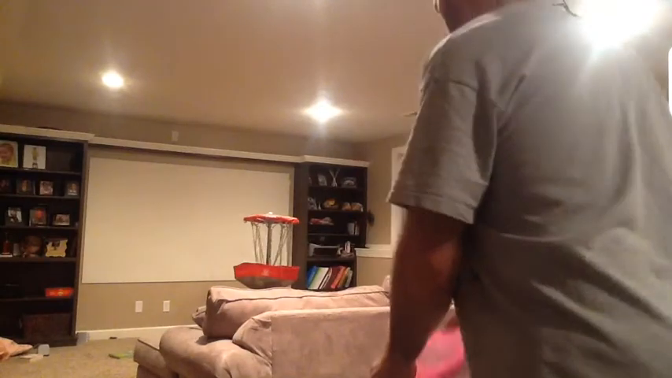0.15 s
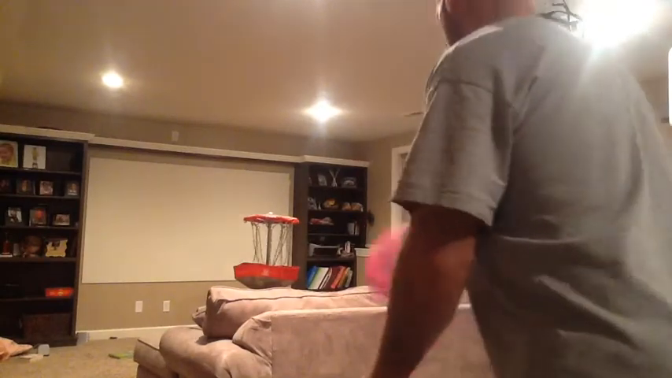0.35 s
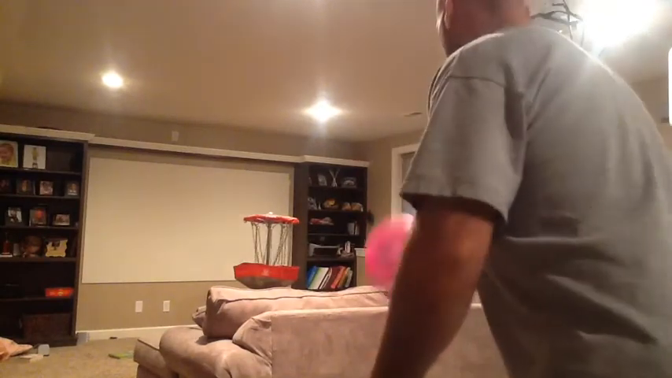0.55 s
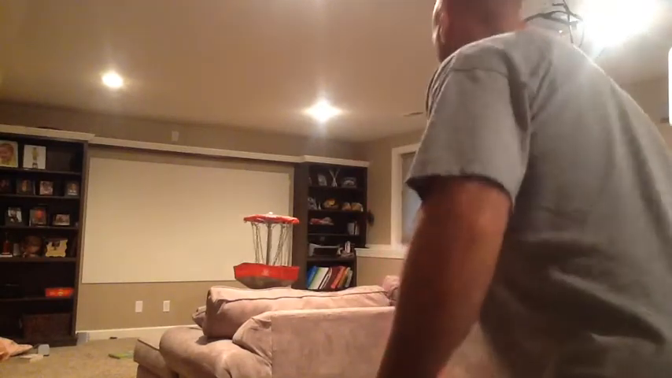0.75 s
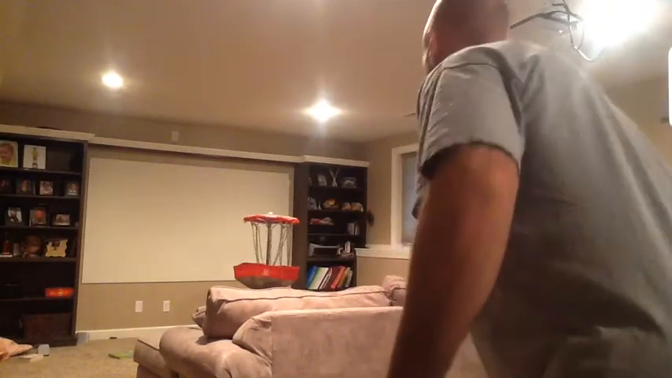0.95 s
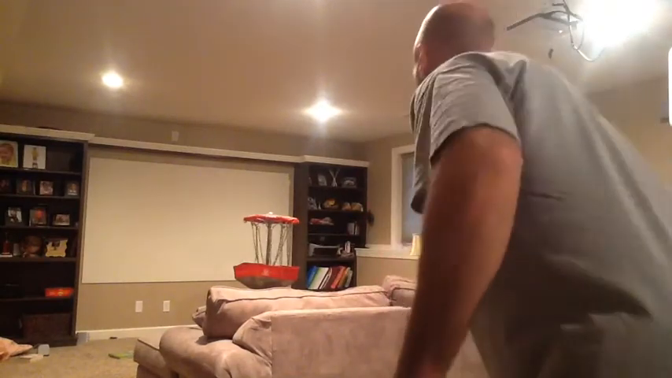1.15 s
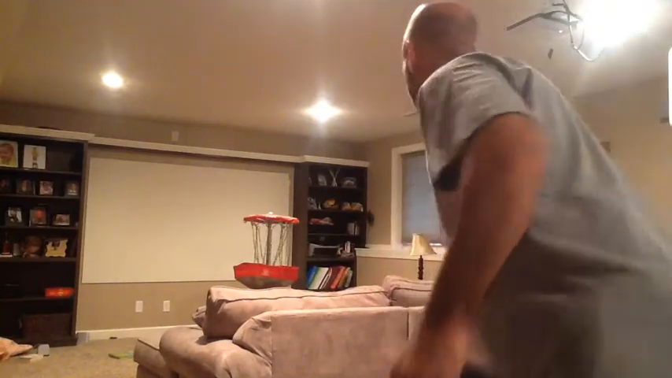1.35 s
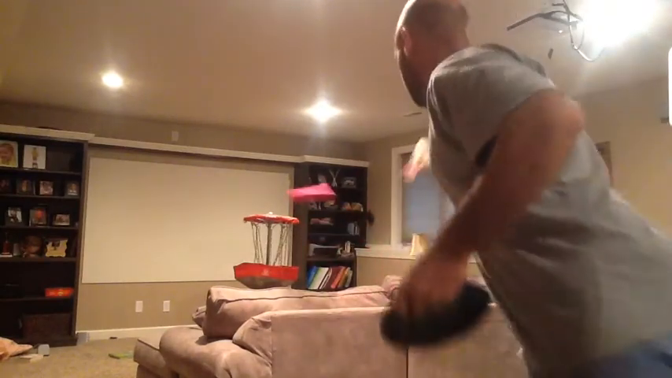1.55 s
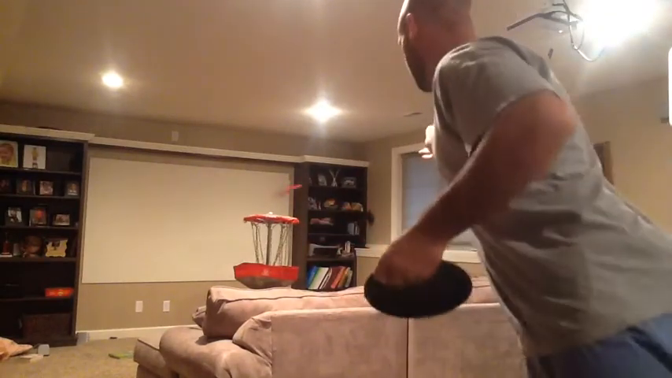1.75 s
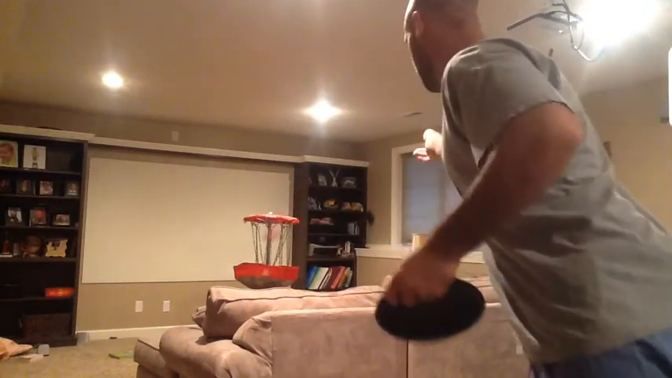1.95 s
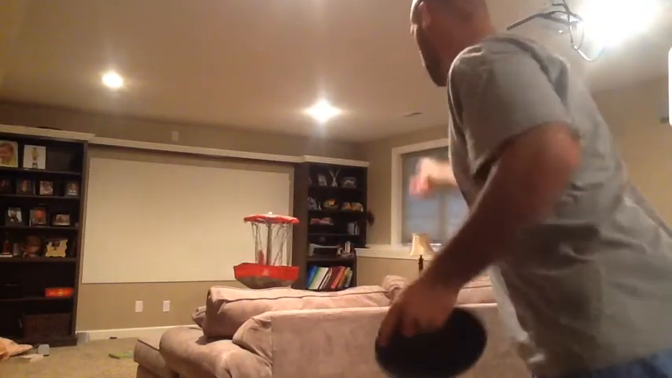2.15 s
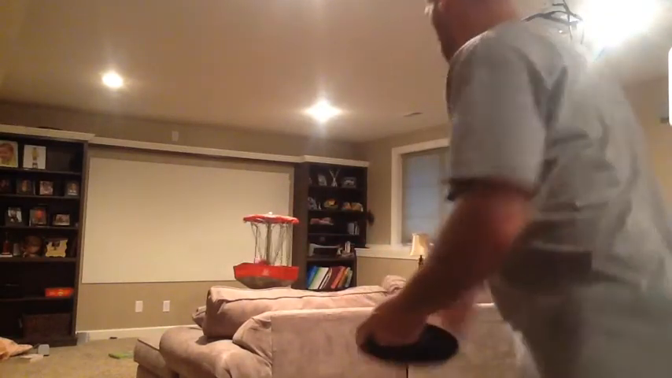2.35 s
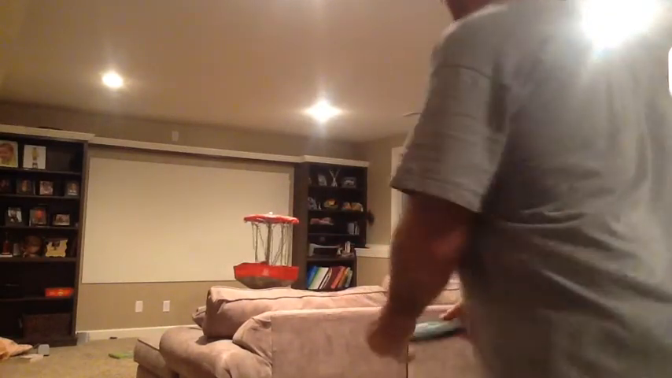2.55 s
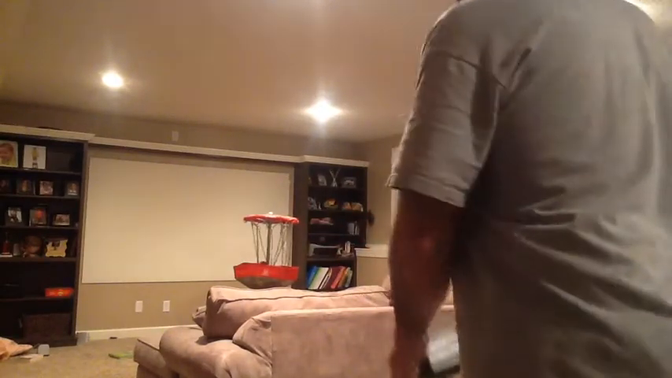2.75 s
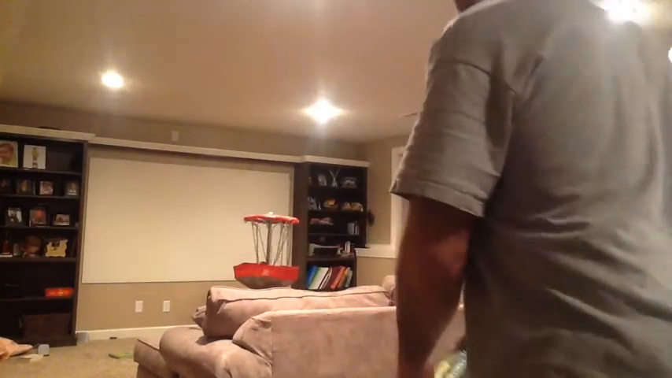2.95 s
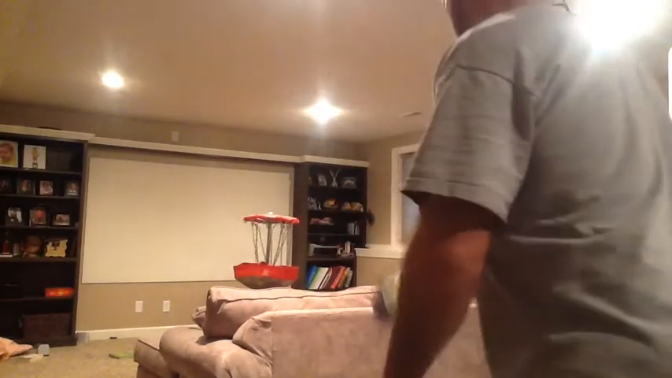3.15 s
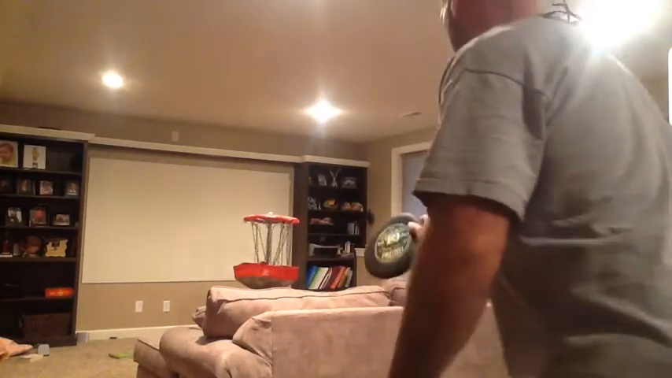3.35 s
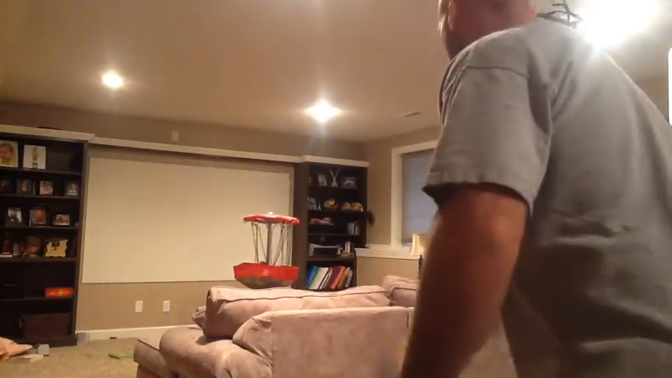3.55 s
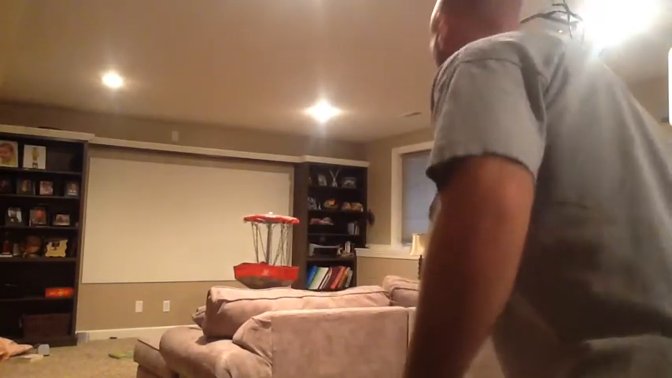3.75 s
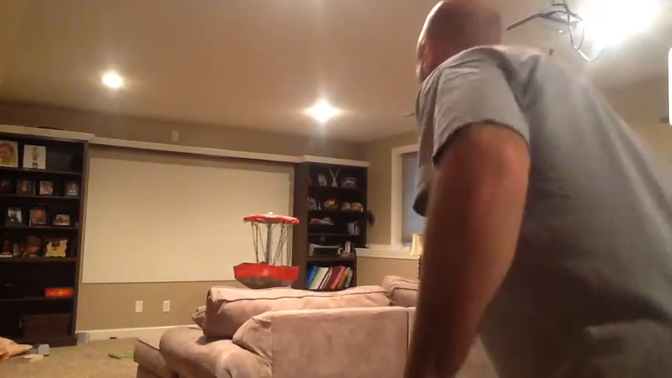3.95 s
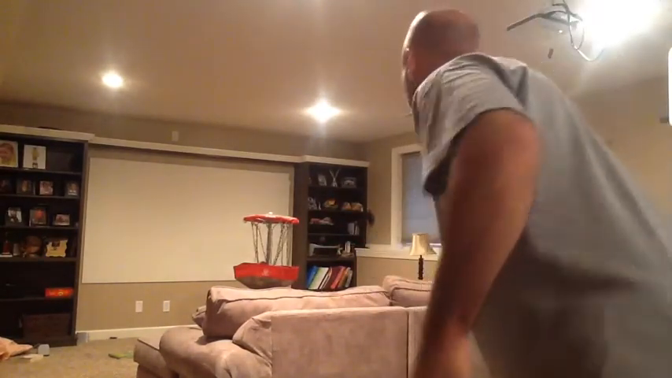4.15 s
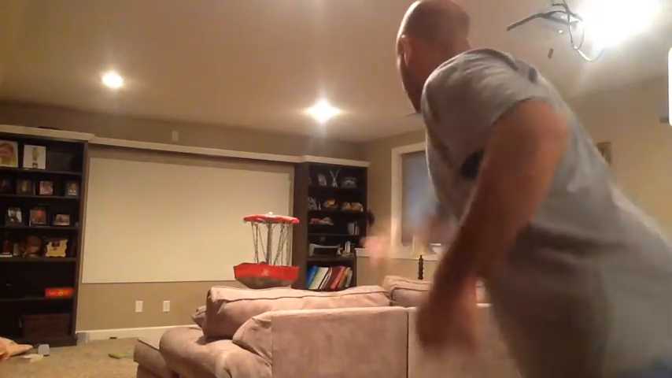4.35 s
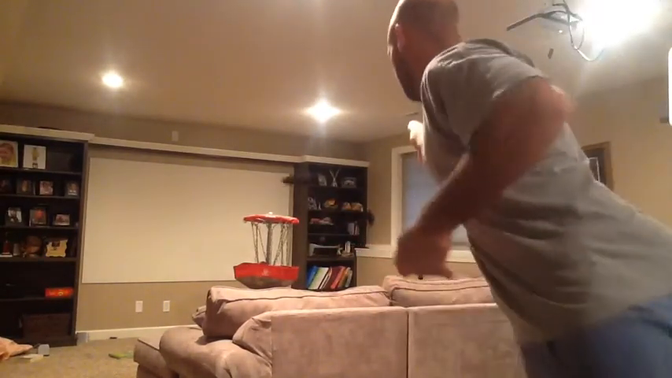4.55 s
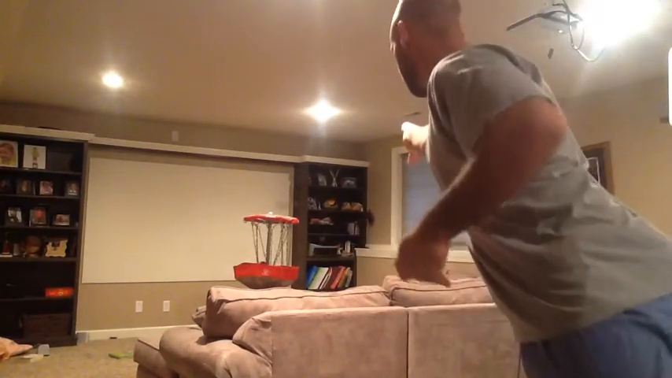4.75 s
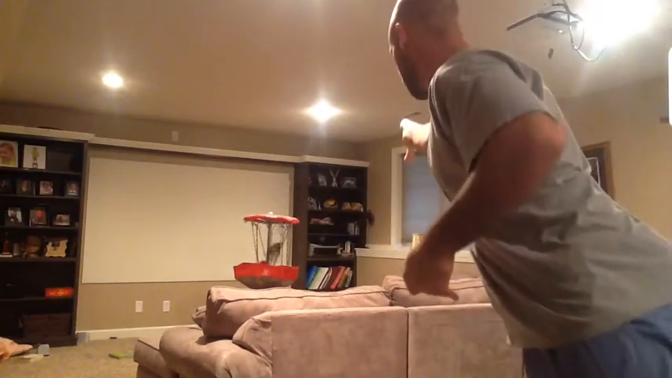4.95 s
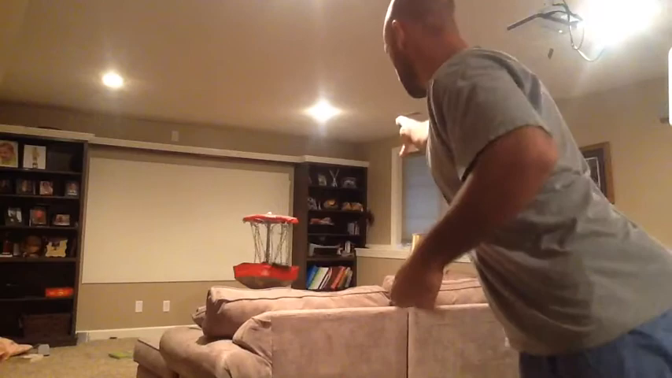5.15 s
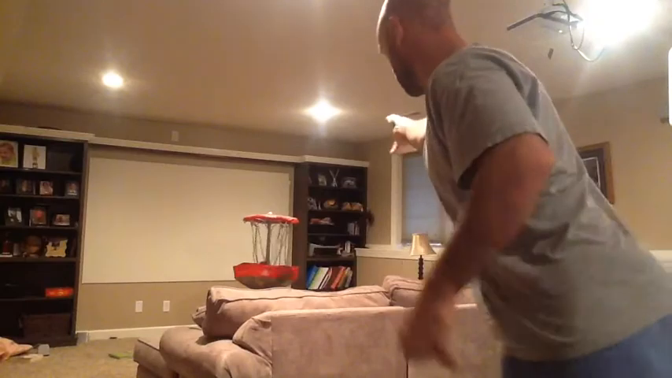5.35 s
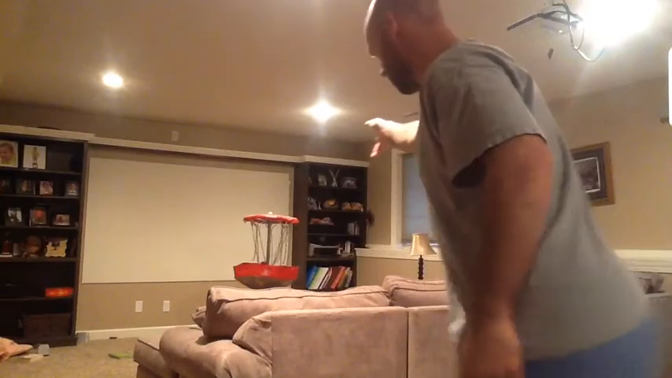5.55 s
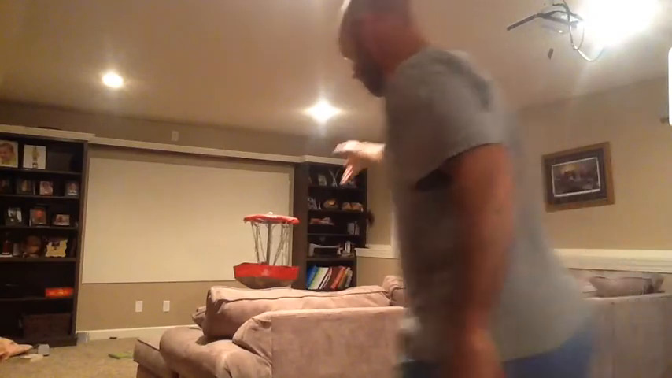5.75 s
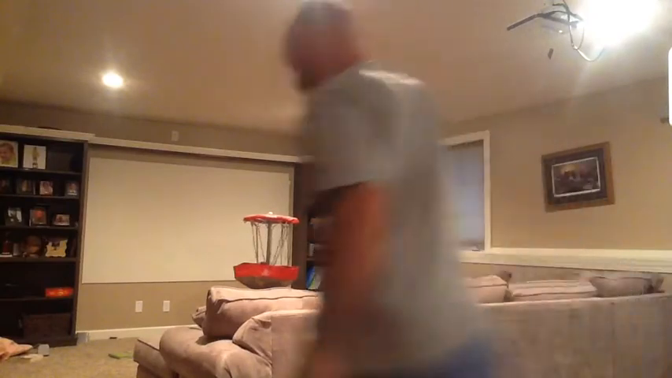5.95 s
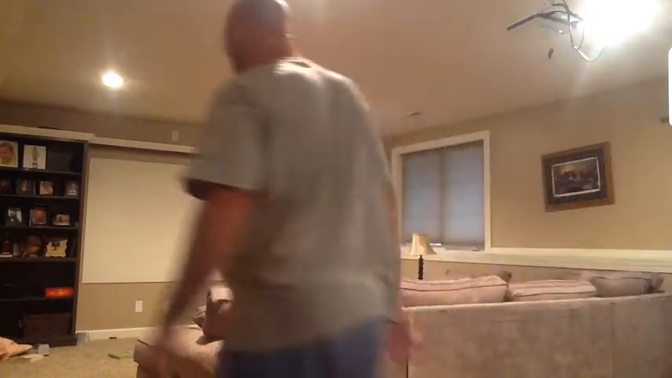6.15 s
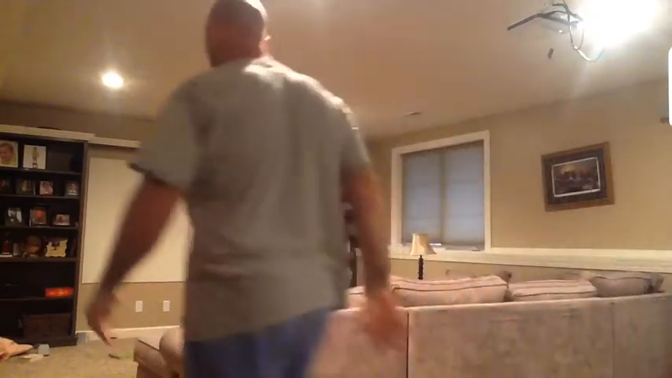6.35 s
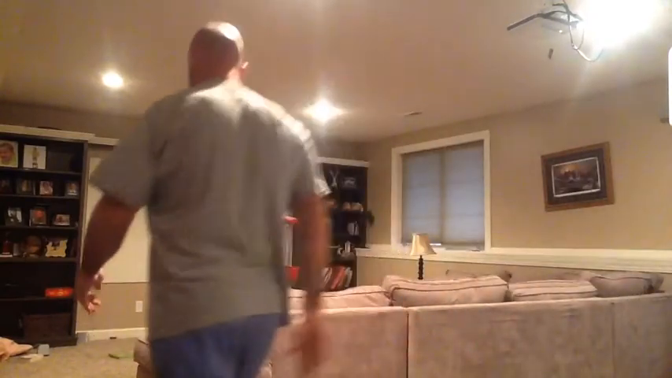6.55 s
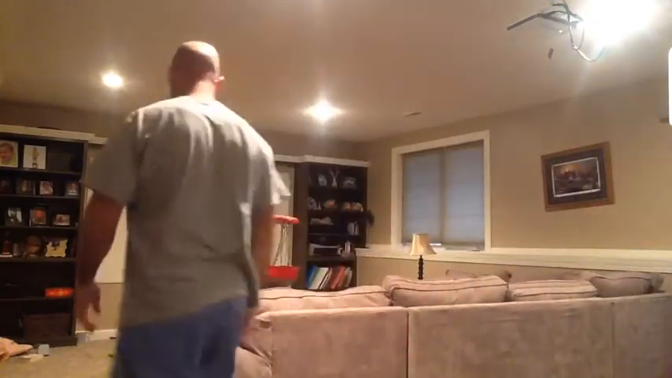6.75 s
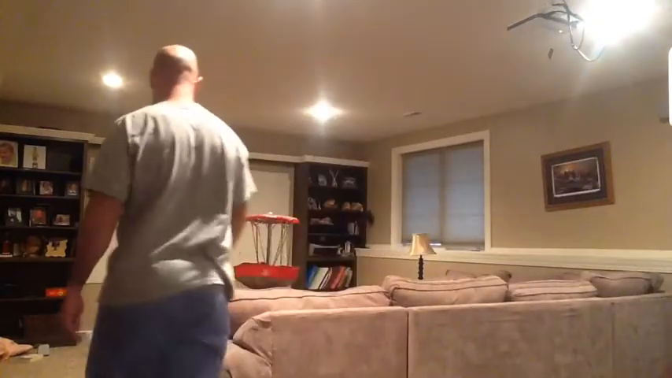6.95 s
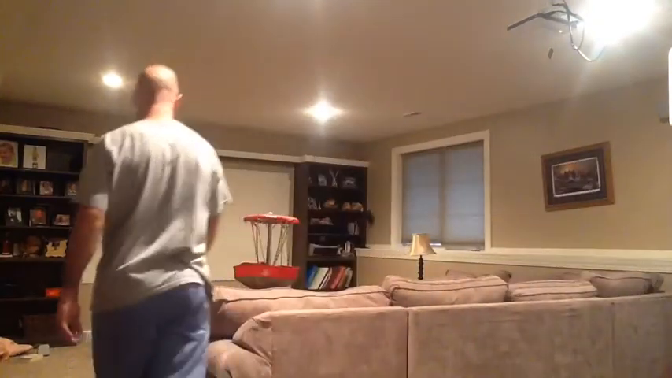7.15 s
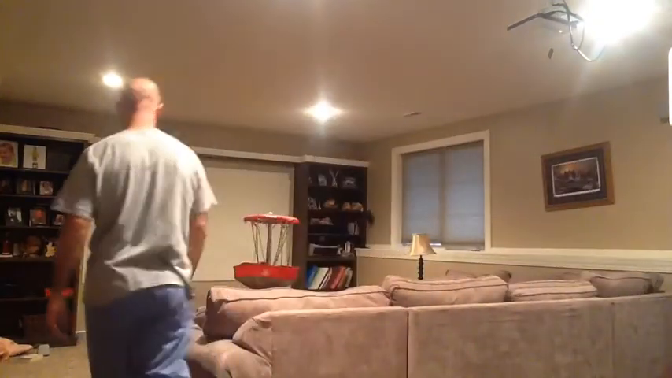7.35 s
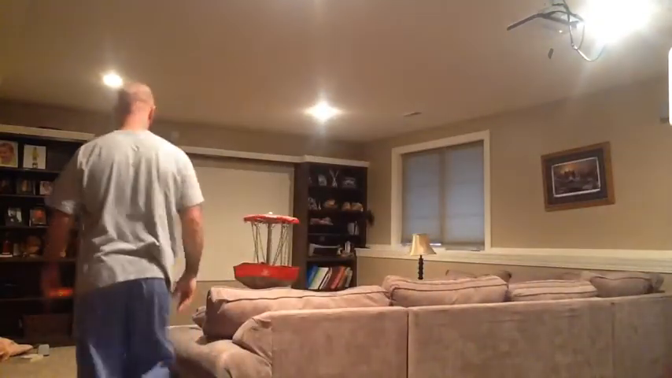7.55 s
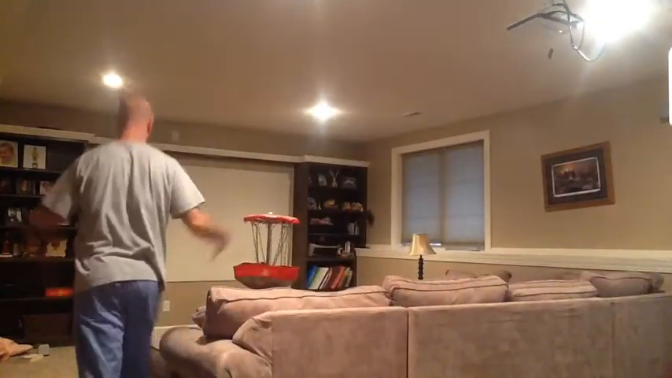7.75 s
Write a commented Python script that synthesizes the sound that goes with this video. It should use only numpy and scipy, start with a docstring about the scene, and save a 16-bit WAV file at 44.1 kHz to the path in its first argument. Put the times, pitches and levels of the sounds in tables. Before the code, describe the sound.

Two plastic discs are thrown, one after the other, into a chain basket across a basement room. Each lands with a sudden, bright metallic jangle, rings the steel pole and settles softly into the tray, while the swaying chains tinkle on. Close to the microphone, clothes swish faintly with each throw, and a few soft steps on carpet follow the second. Faint taps, dull thuds and a low hiss lie underneath.

```python
"""A carpeted basement room, one microphone near the thrower, a chain basket across the room.
Two plastic discs are putted. Each splashes into the chains and drives them against the steel pole,
whose tube rings; then it rattles down into the tray. The swaying chains tinkle link against link.
Close by, clothes and steps rustle; dull floor thuds and faint hollow taps sound over a low hiss."""
import sys
import numpy as np
from scipy import signal
from scipy.fft import rfft, irfft
from scipy.io import wavfile
from scipy.ndimage import uniform_filter1d

SR = 44100
rng = np.random.default_rng(int(sys.argv[2]) if len(sys.argv) > 2 else 0)


def wav_out(sig):
    """Save sig, one row per channel (or a flat mono array), as 16-bit PCM at SR to the path in sys.argv[1]."""
    wavfile.write(sys.argv[1], SR, np.round(np.clip(np.atleast_2d(sig).T, -1, 1) * 32767).astype(np.int16))


N = 347949
SPAN = 32768  # samples for one contact and its echoes
AGE = np.arange(SPAN) / SR  # s since the contact

# a disc meets the chains: t/s, disc level/dB, disc f/Hz, splash level/dB, link level/dB, rattle decay/s
CATCHES = [(2.053, -41, 865, -18, -26, .035), (4.951, -25.5, 1087, -16.5, -21.5, .022)]
# chains slap the pole: t/s, clack level/dB, three-lobed level/dB, rattle decay/s, first chain's lead/s
POLE_HITS = [(2.085, -11, -6.5, 0.0092, 0.00094), (2.167, -18.5, -19, 0.012, .01),
             (4.982, -7.5, -16, 0.0038, 0.0012), (5.124, -17.5, -12.5, 0.012, .018),
             (5.292, -22, -16.5, 0.0076, .016), (5.576, -19, -22.5, 0.018, 0)]


def from_db(db):
    """Decibels as an amplitude."""
    return 10 ** (np.asarray(db) / 20)


def unit(x):
    """Scaled to an energy of one."""
    return x / np.sqrt(np.sum(x ** 2) + 1e-20)


def at_hz(points, hz):
    """A table read on a log-frequency axis."""
    known_hz, values = np.transpose(points)
    return np.interp(np.log(np.maximum(hz, 1)), np.log(known_hz), values)


def low_cut(x, hz):
    """Bass roll-off of 12 dB an octave."""
    return signal.sosfilt(signal.butter(2, hz, "high", fs=SR, output="sos"), x)


def noise(spectrum):
    """Steady coloured noise of rms one."""
    gain = from_db(at_hz(spectrum, np.arange(N // 2 + 1) * SR / N))
    return unit(irfft(rfft(rng.standard_normal(N)) * gain, N)) * np.sqrt(N)


def snap(spectrum):
    """The shortest causal pulse that has this spectrum."""
    gain = from_db(at_hz(spectrum, np.arange(SPAN // 2 + 1) * SR / SPAN))
    cepstrum = irfft(np.log(gain))
    cepstrum[1:SPAN // 2] *= 2  # fold to minimum phase
    cepstrum[SPAN // 2 + 1:] = 0
    return irfft(np.exp(rfft(cepstrum)))


def mode(hz, t60):
    """A struck resonance; small bodies radiate little below their pitch."""
    ring = np.cos(2 * np.pi * hz * AGE) * from_db(-60 * AGE / t60)
    return ring * (1 - np.exp(-AGE * hz / 2))


def rattle(decay_s, per_s=700, uneven_db=4.5, first=1.2):
    """A first contact, then a dying shower of uneven ones."""
    count = int(.3 * SR)
    sizes = from_db(uneven_db * np.clip(rng.standard_normal(count), -2, 1))
    sizes *= rng.choice([-1, 1], count)
    clicks = sizes * (rng.random(count) < per_s / SR) * np.exp(-AGE[:count] / max(decay_s, .001))
    clicks[0] = first
    return clicks


def basement(early_db=1.0, early_s=.016):
    """The room, per band: its share of the spectrum and the energy decay of early echoes and tail."""
    # reverberation time: f/Hz, t60/s
    reverb_times = [(150, 0.48), (2000, 0.42), (4000, .47), (8000, .43), (14000, 0.38)]
    hz, bands = np.arange(SPAN // 2 + 1) * SR / SPAN, []
    early = from_db(early_db) * unit(np.exp(-AGE / early_s))
    for band, (_, t60) in enumerate(reverb_times):
        share = at_hz([(row[0], k == band) for k, row in enumerate(reverb_times)], hz)
        tail = unit(from_db(-60 * AGE / t60))
        bands.append((share, rfft(early ** 2 + tail ** 2)))
    return bands


def across_room(contacts, room, direct_db=-3.5, shelf_echo=.22, shelves=4):
    """Spectrum at the microphone: direct sound plus a diffuse wash, coloured by nearby shelves."""
    white = rfft(rng.standard_normal(SPAN))
    energy = rfft(contacts ** 2, SPAN)  # the echoes of many contacts add in energy
    wash = sum(irfft(white * share) * np.sqrt(np.abs(irfft(energy * decay))) for share, decay in room)
    paths = np.zeros(SPAN)
    paths[0] = 1
    paths[rng.integers(30, 400, shelves)] = shelf_echo * rng.choice([-1, 1], shelves)
    return (from_db(direct_db) * rfft(contacts, SPAN) + rfft(wash)) * rfft(paths)


def strike(out, s, contacts, bodies, room):
    """Contacts at time s set (body, dB) pairs ringing in the room; dB is the loudest moment's rms."""
    start = max(round(s * SR), 0)
    drive = across_room(contacts, room)
    for body, db in bodies:
        sound = irfft(drive * rfft(body))
        loudest = np.sqrt(uniform_filter1d(sound ** 2, size=512).max())
        out[start:start + SPAN] += (from_db(db) / loudest * sound)[:N - start]


def swells(rows):
    """The gain of smooth swells, from rows of peak t/s, level/dB, half length/s."""
    t = np.arange(N) / SR
    return np.sqrt(sum((from_db(db) / (1 + ((t - s) / half) ** 2)) ** 2 for s, db, half in rows))


def hiss(level_db=-59):
    """A faint, steady noise floor."""
    # colour of the hiss: f/Hz, level/dB
    spectrum = [(30, -14.5), (60, -8), (100, 0), (150, 9.5), (330, 6), (500, 8), (800, 3), (1500, 1.5),
                (3000, 0), (4500, 1.5), (8000, 1), (15000, -0.5)]
    return from_db(level_db) * noise(spectrum)


def clothes_and_steps(first_step_s=6.47, pace_s=.572, step_db=-57.5, step_half_s=.16):
    """Near the microphone: feet shuffle on carpet, a sleeve swishes at each putt, three steps follow."""
    # arm swings: peak t/s, level/dB, half length/s
    swishes = [(1.45, -55.5, .13), (4.36, -57.5, .11)]
    # colour of the sleeve: f/Hz, level/dB
    sleeve = [(50, -23.5), (150, -2.5), (450, 0), (900, -2.5), (2000, -9), (4000, -15), (15000, -24.5)]
    # colour of cloth and carpet underfoot: f/Hz, level/dB
    rustle = [(50, -27), (110, -7.5), (190, 0), (400, -4), (800, -9.5), (1500, -15.5), (4000, -19.5),
              (15000, -26)]
    shuffle = (.35, -64, .44)  # columns as for the swings
    steps = [(first_step_s + k * pace_s, step_db, step_half_s) for k in range(3)]
    return swells(swishes) * noise(sleeve) + swells([shuffle] + steps) * noise(rustle)


def links(low_db, upper_db, detune=.005, top_db=-6.0, spread_s=.0013):
    """Four links ring at once, each a little off pitch; the ring takes a moment to spread."""
    # modes of a chain link: f/Hz, t60/s
    link_modes = [(11120, .06), (12930, .06), (13990, .05)]
    swell = 1 - np.exp(-AGE / spread_s)
    rings = [sum(mode(hz * (1 + detune * off), t60) for off in rng.standard_normal(4))
             for hz, t60 in link_modes]
    low, middle, top = [unit(swell * ring) for ring in rings]
    return [(low, low_db), (middle + from_db(top_db) * top, upper_db)]


def touch(decay_s, rebound_s=.033, rebound_db=-10):
    """Two links rattle together, part and meet again more lightly."""
    first, again = rattle(decay_s, first=.9), rattle(decay_s, first=.9)
    lag = int(rebound_s * rng.uniform(.85, 1.15) * SR)
    rebound = np.pad(again, (lag, 0))[:len(first)]
    return unit(first) + from_db(rebound_db) * unit(rebound)


def swaying_chains(room, low_db=-.64, upper_db=-1.2, tick_db=3.0, spark_db=-11.5):
    """Hanging chains touch lightly: a dry tick, a bright spark of contact and the ring of the links."""
    # the clearest touches: t/s, level/dB, relative upper modes/dB, relative clack/dB
    tinkles = [(0.057, -45.5, -10, 1.5), (0.209, -52.5, -4, -8), (0.414, -49, -4, 7),
               (0.467, -51.5, -4, 3.5), (0.583, -52, -4, -2), (0.71, -52, -15, -12),
               (0.929, -41.5, 8, -12.5), (1.178, -55, -8, 6.5), (1.917, -43, 4.5, -17),
               (2.345, -33.5, -2, -11), (2.383, -37.5, -5, -2.5), (2.49, -38.5, -6, -21),
               (2.61, -48.5, 1, 0.5), (2.726, -45.5, 3, -18), (2.742, -32.5, 3.5, -26),
               (2.823, -35.5, -2, -28), (3.155, -53.5, -6, 3.5), (3.636, -57, -2, 1.5), (5.38, -29, 2, -7),
               (5.507, -35, 4, -7.5), (5.544, -34, -9, -4.5), (6.022, -41, 2, -6),
               (6.116, -37.5, -4.5, -20), (6.252, -38, -6, -17), (6.338, -36.5, 0, -18),
               (6.921, -49, -6, -9), (7.001, -47, 3, -16), (7.102, -41.5, -10, -18),
               (7.209, -25.5, -11, -32.5)]
    # colour of link meeting link: f/Hz, level/dB
    tick_spectrum = [(500, -14.5), (2800, -9), (3600, -3.5), (4500, 4), (6000, -3.5), (8000, -3.5),
                     (9800, 0.5), (12000, -3), (15000, -8.5)]
    out, tick = np.zeros(N), snap(tick_spectrum)
    spark = mode(hz=12000, t60=.001) * AGE
    for s, db, upper, clack in tinkles + jangle() + strays():
        contacts = touch(decay_s=.012 * from_db(.19 * clack))  # links that clack rattle longer
        ring = links(db + low_db, db + upper + upper_db)
        click = [(tick, db + clack + tick_db), (spark, db + spark_db)]
        strike(out, s, contacts, ring + click, room)
    return out


def floor_thuds(room):
    """Soft contacts on the carpet wake the floor's damped resonances."""
    # thuds: t/s, level/dB, contact decay/s
    thuds = [(.285, -57, 0.023), (.545, -54.5, 0.011), (5.618, -32, .002), (6.003, -48.5, 0.0063),
             (6.97, -54, .03), (7.59, -58, 0.026)]
    # modes of the floor: f/Hz, level/dB, t60/s
    floor_modes = [(146, -1, 0.05), (200.6, 0, 0.041), (424, -8.5, 0.056)]
    out = np.zeros(N)
    floor = sum(from_db(db) * unit(mode(hz, t60)) for hz, db, t60 in floor_modes)
    for s, db, decay_s in thuds:
        strike(out, s, rattle(decay_s), [(floor, db)], room)
    return out


def hollow_taps(room):
    """Faint hollow taps, each one quickly damped resonance."""
    # taps: t/s, level/dB, f/Hz
    taps = [(1.452, -47.5, 880), (2.895, -57, 848), (3.225, -62.5, 850), (4.35, -53, 800),
            (4.655, -55, 420), (5.505, -51, 750), (5.825, -54, 1250)]
    out = np.zeros(N)
    for s, db, hz in taps:
        strike(out, s, rattle(decay_s=.009), [(mode(hz, t60=.022), db)], room)
    return out


def discs(room, low_ratio=.6, low_db=-1.5):
    """Each disc sweeps many links at once, its plastic rings briefly, and it drops into the tray."""
    # colour of the splash into the chains: f/Hz, level/dB
    splash_spectrum = [(80, -34), (200, -8.5), (600, -2), (1500, 0.5), (2800, -2), (4300, 1), (6200, -2),
                       (7400, -6), (10000, -1.5), (13000, 1), (15000, -4)]
    # colour of plastic on the tray: f/Hz, level/dB
    tray_spectrum = [(70, -28), (170, -4.5), (400, -2.5), (850, -0.5), (1500, -5.5), (2500, -10),
                     (6000, -18), (15000, -31)]
    # a disc wobbles and scrapes down: t/s, level/dB, rattle decay/s
    settling = [(2.311, -51, 0.05), (2.38, -40.5, .055), (2.47, -51, .1), (5.19, -48, 0.061),
                (5.306, -44.5, 0.036), (5.40, -55.5, 0.15), (5.74, -55, 0.13)]
    out, splash, tray = np.zeros(N), snap(splash_spectrum), snap(tray_spectrum)
    for s, disc_db, hz, splash_db, link_db, decay_s in CATCHES:
        contacts = rattle(decay_s, per_s=1500)
        plastic = [(mode(hz, t60=.006), disc_db), (mode(hz * low_ratio, t60=.011), disc_db + low_db)]
        strike(out, s, contacts, plastic + [(splash, splash_db)] + links(link_db, link_db), room)
    for s, db, decay_s in settling:
        strike(out, s, rattle(decay_s, per_s=400, first=.6), [(tray, db)], room)
    return out


def frame_thumps(room, base_db=-26.0, db_per_db=.31):
    """The basket's frame thumps at each catch, louder for a louder disc."""
    out, frame = np.zeros(N), mode(hz=211, t60=.05)
    for s, disc_db, *_, decay_s in CATCHES:
        strike(out, s, rattle(decay_s), [(frame, base_db + db_per_db * disc_db)], room)
    return out


def tube(hz, stretch, step_db, t60, damping=.43, count=13):
    """One wall shape of the pole, as rows: its modes crowd just above the lowest and die ever faster."""
    return np.array([from_db(step_db * k) * mode(hz * (1 + stretch * k * k), t60 / (1 + damping * k))
                     for k in range(count)])


def struck(modes):
    """Every place of contact weights the tube's modes anew."""
    return (rng.uniform(.3, 1, len(modes)) * rng.choice([-1, 1], len(modes))) @ modes


def pole(room, first_chain_db=-5.5, upper_db=-3.5, slide_delay_s=.04, slide_db=-12.5):
    """One chain slaps the steel tube, then the rest; sliding off, they keep its oval modes ringing."""
    # colour of chain on pole: f/Hz, level/dB
    clack_spectrum = [(80, -35.5), (200, -20.5), (400, -16.5), (1000, -17), (2200, -11.5), (2900, -16.5),
                      (3400, -1.5), (4400, 1), (5300, -3), (7600, -5), (9000, -4), (10300, 1.5),
                      (12200, -3.5), (15000, -8.5)]
    out, clack = np.zeros(N), snap(clack_spectrum)
    oval = tube(hz=3275, stretch=.0024, step_db=-.7, t60=.2)
    lobed = tube(hz=9115.5, stretch=.0007, step_db=-.85, t60=.0653)  # the wall flexes in three lobes
    for s, clack_db, lobed_db, decay_s, lead_s in POLE_HITS:
        oval_db = -22.5 + .1 * clack_db
        link_db = -16.5 + .77 * clack_db
        for when, force_db in [(s - lead_s, first_chain_db), (s, 0)]:
            bodies = [(struck(oval), oval_db), (struck(lobed), lobed_db), (clack, clack_db)]
            bodies += links(link_db, link_db + upper_db)
            strike(out, when, rattle(decay_s), [(body, db + force_db) for body, db in bodies], room)
        strike(out, s + slide_delay_s, rattle(decay_s=.06), [(struck(oval), oval_db + slide_db)], room)
    return out


def jangle(gap_s=.045, start_db=-17.0, loss_db=3, upper_db=-5.5, clack_db=-4.0, count=5):
    """Each slap on the pole shakes loose a dying run of touches, as rows like the tinkles."""
    return [(s + gap_s * (k + rng.uniform(.7, 1.3)), db + start_db - loss_db * k, upper_db, clack_db)
            for s, db, *_ in POLE_HITS for k in range(count)]


def strays(delay_s=(.55, 2), level_db=-61.5, upper_db=-11.0, clack_db=-4.0, count=4):
    """Chance touches while the chains sway after a catch, as rows like the tinkles."""
    return [(s + delay, level_db, upper_db, clack_db)
            for s, *_ in CATCHES for delay in rng.uniform(*delay_s, count)]


def scene():
    """In mono: basket and knocks across the room, the thrower close by, the hiss under it all."""
    room = basement()
    basket = swaying_chains(room) + discs(room) + pole(room)
    knocks = low_cut(floor_thuds(room) + frame_thumps(room) + hollow_taps(room), hz=90)
    distant = low_cut(basket + knocks, hz=115)  # the basket is too small to radiate deep bass
    return (distant + clothes_and_steps() + hiss())[None]


def record(dry, ceiling=.98, cutoff_hz=15400):
    """The hardest hits overload the microphone input; the top treble is cut steeply."""
    low_pass = signal.ellip(10, .1, 70, cutoff_hz, fs=SR, output="sos")
    return signal.sosfilt(low_pass, np.clip(dry, -ceiling, ceiling))


dry = scene()
out = record(dry)
wav_out(out)
```